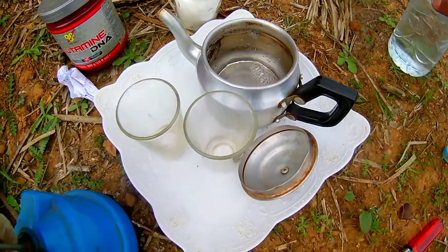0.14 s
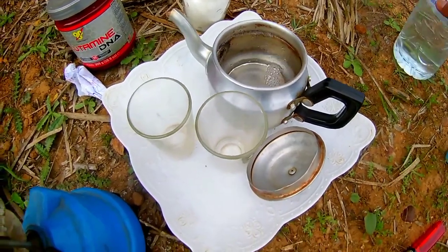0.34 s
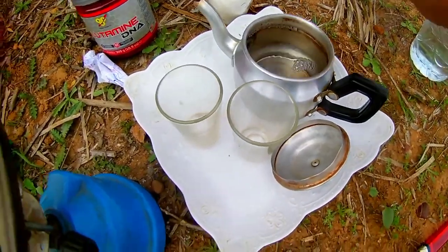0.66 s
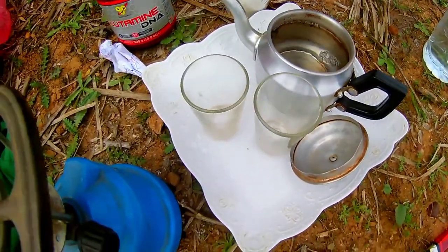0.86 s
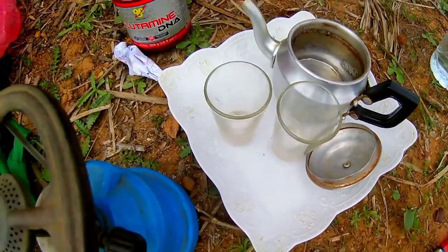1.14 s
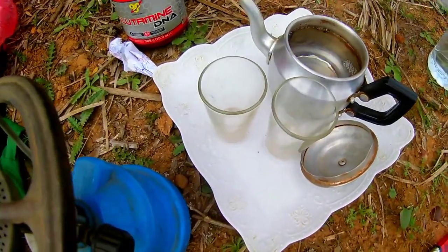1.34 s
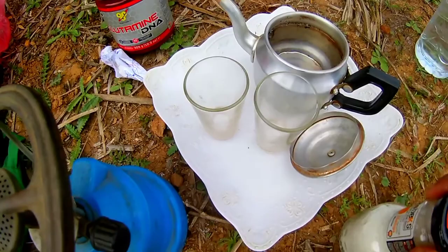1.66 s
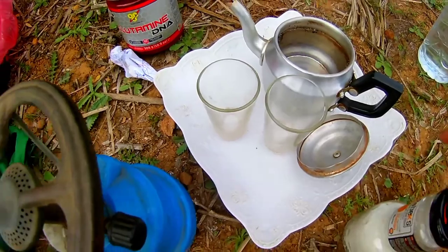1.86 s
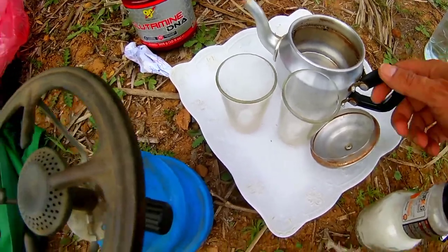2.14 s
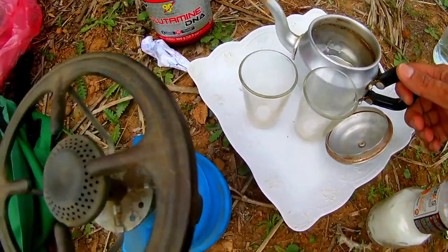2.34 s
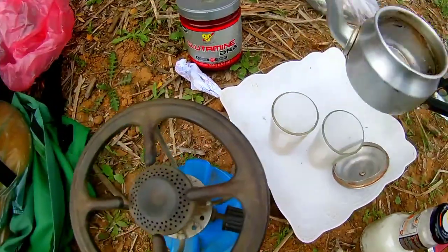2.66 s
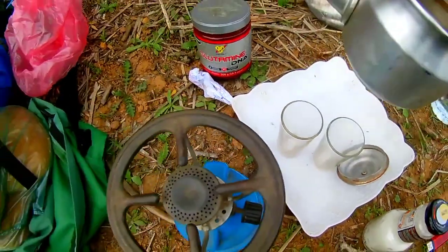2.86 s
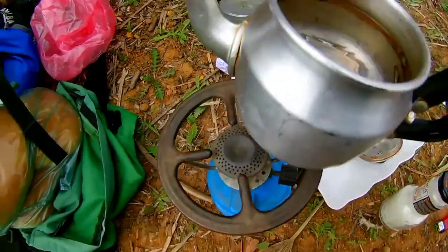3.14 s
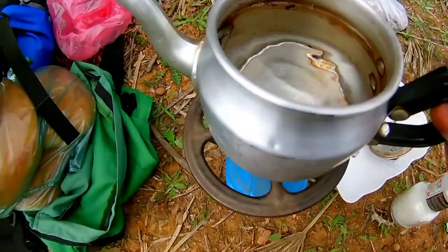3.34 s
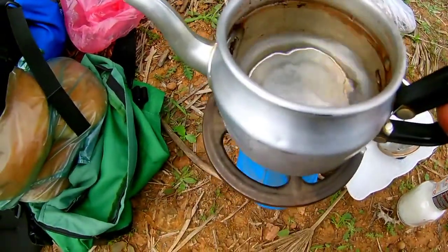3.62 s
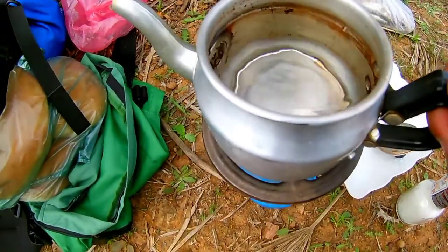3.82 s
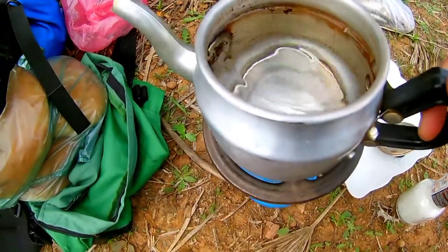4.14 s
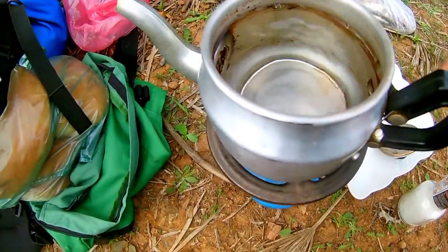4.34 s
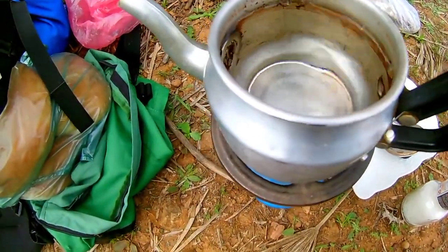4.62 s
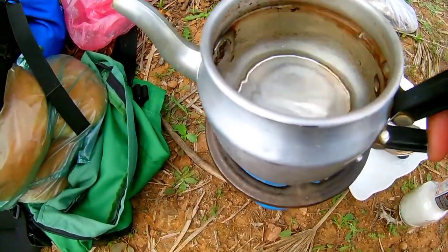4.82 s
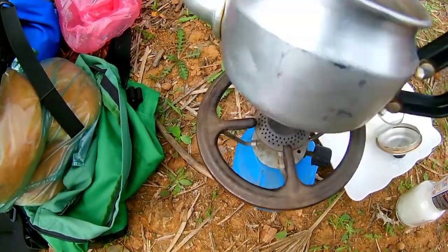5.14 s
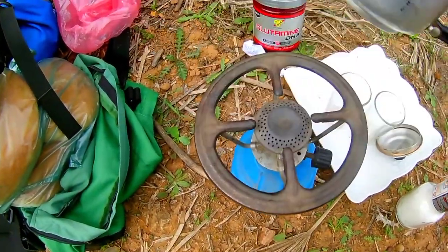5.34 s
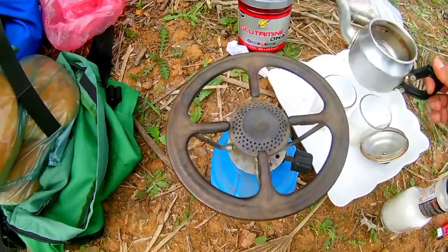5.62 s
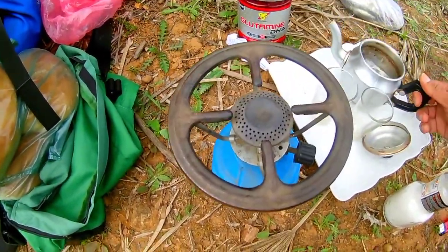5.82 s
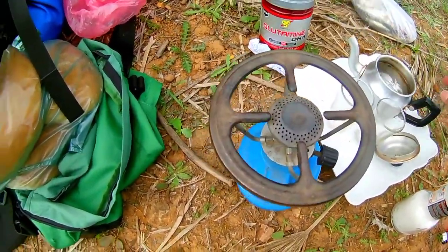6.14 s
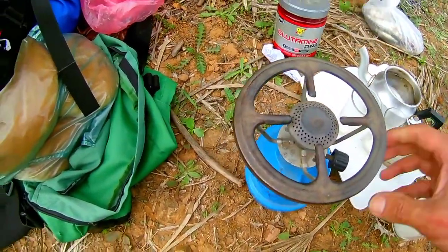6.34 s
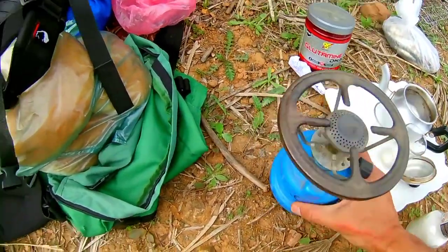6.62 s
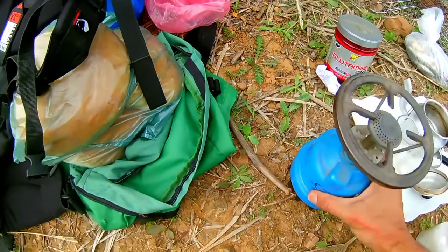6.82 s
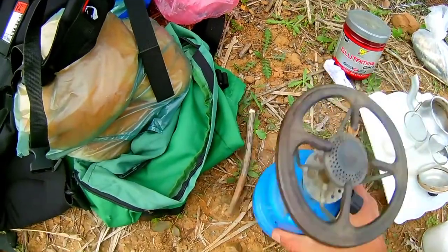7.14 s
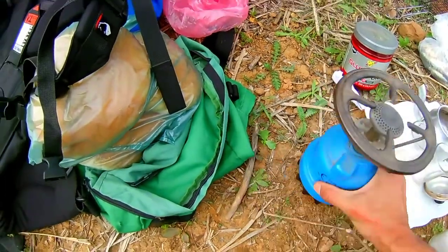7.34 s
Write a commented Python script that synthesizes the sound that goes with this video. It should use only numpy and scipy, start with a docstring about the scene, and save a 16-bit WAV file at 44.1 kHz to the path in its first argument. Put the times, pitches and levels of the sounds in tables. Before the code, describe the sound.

Outdoors in light wind, a jar is set down, a metal teapot scrapes and clinks off a plastic tray, then a stove drags over soil.

```python
"""Camping gear handled in light wind

A jar is set down outdoors, a metal teapot is dragged off a plastic tray, tried on a gas stove's iron
ring and put back beside two glasses; then the stove itself is shoved across the soil.
Blows and sliding grit ring the modes of each thing, with decaying sines for clear clinks and low bumps
and narrow gliding noise for squeals. Shaped noise makes the wind and the microphone's hiss.
"""
import sys
import numpy as np
from scipy import signal
from scipy.fft import rfft, irfft
from scipy.io import wavfile
from scipy.ndimage import uniform_filter1d

SR = 44100
rng = np.random.default_rng(int(sys.argv[2]) if len(sys.argv) > 2 else 0)


def dump_mix(stems):
    """Bounce the given channels to the path in sys.argv[1] as a 16-bit WAV at rate SR."""
    frames = np.atleast_2d(stems).T  # one column per channel
    limited = np.clip(frames, -1, 1)  # hard clip at full scale
    pcm = np.round(limited * 32767).astype(np.int16)
    wavfile.write(sys.argv[1], SR, pcm)


N = 329427  # length of the scene [samples]


def gain_of(db):
    """Level law: decibels to an amplitude factor."""
    return 10 ** (np.asarray(db) / 20)


def evened(x):
    """Normalisation: scales a signal to rms 1."""
    return x / np.sqrt(np.mean(x ** 2) + 1e-20)


def read(points, hz):
    """Logarithmic pitch scale: interpolates a spectrum table between its points."""
    f, value = np.transpose(points)
    return np.interp(np.log(hz + 1), np.log(f + 1), value)


def add(mix, s, sound):
    """Superposition: mixes a sound in at time s [s]."""
    part = mix[round(s * SR):][:len(sound)]
    part += sound[:len(part)]


def wander(samples):
    """Low-passed chance: a moving average of white noise, at rms 1."""
    return evened(uniform_filter1d(rng.standard_normal(N), samples))


def noise(spectrum, lumps_db, lump_s):
    """Spectral shaping: coloured noise of rms 1 from white noise whose level wanders in lumps."""
    lumps = wander(max(int(lump_s * SR), 2))
    white = rng.standard_normal(N) * gain_of(lumps_db * lumps)
    colour = gain_of(read(spectrum, np.fft.rfftfreq(N, 1 / SR)))
    return evened(irfft(rfft(white) * colour, N))


def body(modes, colour, knock_db, edges_hz, scatter_db, size=4096):
    """Modal response to a click at one spot: dying modes over a short knock, in bands of energy 1."""
    t = np.arange(size) / SR
    hz = np.abs(np.fft.fftfreq(size, 1 / SR))
    f, width, db = np.transpose(modes)[:, :, None]
    chance = rng.standard_normal((len(modes), 2, 1))
    db = db + scatter_db * chance[:, 0]  # each spot couples to the modes in its own measure
    f = f * (1 + 0.029 * chance[:, 1])  # the load of the contact detunes them a little
    decay = np.exp(-np.pi * width * t)  # a wider resonance dies sooner
    rings = (gain_of(db) * width * decay * np.sin(2 * np.pi * f * t)).sum(0)
    # the minimum-phase response puts the knock's energy as early as its colour allows
    log_gain = read(colour, hz) * np.log(10) / 20
    knock = np.fft.ifft(np.exp(np.conj(signal.hilbert(log_gain)))).real
    both = evened(rings) + gain_of(knock_db) * evened(knock)
    parts = []
    for band in zip(edges_hz, edges_hz[1:]):
        band_filter = signal.butter(3, band, "band", fs=SR, output="sos")
        parts.append(signal.sosfilt(band_filter, both))
    parts = np.array(parts)
    return parts / np.linalg.norm(parts, axis=1, keepdims=True)


def at_spots(force, thing, dwell_s=0.018, count=6):
    """Position-dependent coupling: each short stretch of force rings the thing from a random spot."""
    spots = [body(*thing) for _ in range(count)]
    moves = np.r_[0, np.flatnonzero(rng.random(N) < 1 / (dwell_s * SR)), N]
    out = np.zeros(N)
    spot = rng.integers(0, count, N)
    for a, b in zip(moves, moves[1:]):
        if force[:, a:b].any():
            rung = signal.fftconvolve(force[:, a:b], spots[spot[a]], axes=1).sum(0)
            add(out, a / SR, rung)
    return out


def band_levels(middle, treble_db):
    """Contact hardness: levels [dB] of bass, middle and treble; the middle follows the treble."""
    at_equal_db, db_per_treble_db = middle
    return 0, at_equal_db + db_per_treble_db * treble_db, treble_db


def struck(blows, middle, rise, tick):
    """Impact: each blow is one hard tick and a quick burst of tiny contacts, as three bands of force."""
    contacts_per_s = 4000
    size = 4000  # longest burst [samples]
    contacts = rng.random(N + size) < contacts_per_s / SR
    chatter = evened(rng.standard_normal(N + size) * contacts)
    force = np.zeros((3, N))
    for s, db, treble_db, length in blows:
        u = np.arange(size) / SR / length
        for k, band_db in enumerate(band_levels(middle, treble_db)):
            # the treble is spent sooner
            shape = np.minimum(u / rise, 1) * np.exp(-(1 + 0.15 * k) * u)
            # the blow's energy is shared among its contacts
            burst = evened(shape * chatter[round(s * SR):][:size]) * shape.std()
            burst[40] += tick / (1 + k) * np.sqrt(length * SR)
            add(force[k], s, gain_of(db + band_db) * burst)
    return force


def rubbed(slides, middle, grit_db, grains_per_s):
    """Sliding friction: strokes over a stream of uneven grit that catches and lets go in lumps."""
    slip_db, slip_s = 3, 0.012
    skirt_db = 20  # each stroke swells and fades by this much over its rise and fall
    grit = rng.choice([-1., 1.], N) * gain_of(grit_db * np.minimum(rng.exponential(1, N), 4))
    slips = gain_of(slip_db * wander(max(int(slip_s * SR), 2)))
    grit = evened(grit * slips * (rng.random(N) < grains_per_s / SR))
    force, t = np.zeros((3, N)), np.arange(N) / SR
    for s, db, treble_db, rise_s, fall_s in slides:
        away = np.maximum((s - t) / rise_s, (t - s) / fall_s)
        stroke = (away < 1) * gain_of(db - skirt_db * away) * grit
        force += gain_of(band_levels(middle, treble_db))[:, None] * stroke
    return force


def handled(blows, slides, thing, middle, grit_db, grains_per_s, rise, tick):
    """Source and resonator: the forces of blows and slides ring the same thing.

    thing: modes, colour, knock re modes [dB], band edges [Hz], scatter of the modes [dB]
    middle: (middle re bass when treble equals bass [dB], slope [dB per dB of treble])
    rise: onset as a share of the contact; tick: strength of the tick re the burst
    """
    force = struck(blows, middle, rise, tick) + rubbed(slides, middle, grit_db, grains_per_s)
    return at_spots(force, thing)


def wind():
    """Turbulence: lumpy low buffeting at the microphone and a softer broad rush above it."""
    # wind strength: (time [s], buffeting level [dB], rush level [dB])
    gusts = [(0, -77, -65), (.35, -66, -66), (1.1, -71, -68.5), (1.5, -90, -65), (2.0, -96, -68),
             (3.0, -68, -68.5), (3.5, -96, -64), (3.8, -71, -65), (4.44, -66.5, -70.5), (4.53, -54, -68.5),
             (4.98, -57, -63), (5.121, -78, -65.5), (5.65, -65, -69.5), (6.3, -74, -69), (7.47, -64.5, -65)]
    # spectrum of the buffeting: (frequency [Hz], relative level [dB per Hz])
    buffet_spectrum = [(12, -20), (30, 3), (55, 2), (100, -8), (200, -22.5), (500, -74)]
    # spectrum of the rush: (frequency [Hz], relative level [dB per Hz])
    rush_spectrum = [(80, 2), (200, 1), (500, -4.5), (1000, -11), (2000, -17), (4000, -30), (8000, -53)]
    t = np.arange(N) / SR
    s, buffet_db, rush_db = np.transpose(gusts)
    buffet = gain_of(np.interp(t, s, buffet_db)) * noise(buffet_spectrum, 3.4, 0.014)
    rush = gain_of(np.interp(t, s, rush_db)) * noise(rush_spectrum, 2.2, 0.019)
    return buffet + rush


def jar():
    """Impact on broad, quickly damped modes: the jar is set down."""
    # blows: (time [s], force [dB], treble re bass [dB], contact length [s])
    jar_blows = [(0.02, -51, -33, 0.014), (0.234, -53, -14, 0.0082), (0.245, -51, -20, 0.0016),
                 (0.353, -57.5, -9.5, 0.019), (0.379, -59.5, -15, 0.005), (1.6068, -50.5, -4.5, 0.0035)]
    # modes before scatter: (frequency [Hz], width [Hz], relative level [dB])
    jar_modes = [(1150, 340, 9), (4200, 450, -24), (6270, 300, -11)]
    # broad colour of the knock: (frequency [Hz], relative level [dB per Hz])
    jar_colour = [(40, -9), (150, 14), (420, -1), (1700, -5), (7000, -39)]
    thing = (jar_modes, jar_colour, 1.5, (40, 1200, 2500, 7200), 2.5)
    return handled(jar_blows, [], thing, middle=(4.5, 0.28), grit_db=3.0, grains_per_s=3000,
                   rise=0.1, tick=0.25)


def clinks():
    """Free vibration: single modes of glass and thin metal ring on, trembling, until stilled."""
    # rings: (time [s], level before decay and tremble [dB], frequency [Hz], rise [s],
    #         time to decay by 60 dB [s], stilled after [s])
    clink_rings = [(.091, -53, 1144, 0.012, 0.074, .2), (1.6051, -30.5, 1163, 0.00036, 0.023, 0.002),
                   (2.373, -49, 915, 0.0025, 0.38, 0.04), (2.405, -70, 3410, 0.014, 0.81, 0.05),
                   (2.447, -57.5, 3304, 0.0023, 1.8, 0.16), (2.6, -69.5, 3330, .01, 1.1, 0.12),
                   (3.265, -64, 900, .01, 0.82, 0.098), (3.349, -57.5, 3620, .0021, 0.041, .1),
                   (3.51, -53.5, 370, .008, 0.09, .1), (3.6, -67.5, 1590, 0.015, 2.7, 0.21),
                   (3.64, -60.5, 335, 0.024, 0.38, 0.11), (3.866, -43.5, 1790, 0.0043, 0.047, .1),
                   (3.864, -51.5, 2250, 0.001, 0.042, .1), (3.869, -46.5, 529, 0.0028, 0.097, .15),
                   (4.943, -53.5, 1780, 0.0044, 0.14, .08), (4.947, -41.5, 534, 0.0039, 0.037, .1),
                   (5.953, -71, 5192, 0.0046, 0.46, 0.062), (6.21, -49.5, 592, 0.0024, 0.035, .1),
                   (6.485, -68.5, 3820, .003, 0.085, .02), (6.494, -32.5, 1380, 0.031, 0.066, .1),
                   (6.799, -58.5, 689, 0.0074, .8, 0.15), (7.305, -74, 9300, .005, 0.36, 0.049)]
    damp_s = 0.003  # time constant with which a touch stills a ring
    tremble_db = 2.5  # rocking makes the level waver
    out, t = np.zeros(N), np.arange(SR // 2) / SR
    for s, db, hz, rise, t60, length in clink_rings:
        shape = np.minimum(t / rise, 1) * np.exp(-np.maximum(t - length, 0) / damp_s)
        add(out, s, gain_of(db - 60 * t / t60) * shape * np.sin(2 * np.pi * hz * (s + t)))
    return out * gain_of(tremble_db * wander(350))


def tray():
    """Impact and friction on damped modes: the plastic tray is knocked and scraped."""
    # blows: (time [s], force [dB], treble re bass [dB], contact length [s])
    tray_blows = [(0.866, -32, -19.5, 0.0084), (0.882, -40.5, -12, 0.012), (0.898, -46, -20, 0.0041),
                  (2.148, -47.5, -17.5, 0.024), (2.574, -34, -20, 0.019), (2.589, -32.5, -15, 0.0029),
                  (2.627, -36.5, -16, 0.017), (2.729, -36, -19, 0.0093), (5.656, -53.5, -11, 0.0077),
                  (5.679, -52.5, -16, 0.008), (5.878, -22.5, -19, 0.0085), (5.891, -38.5, -2, 0.0047),
                  (5.906, -34.5, -21, 0.0049), (5.9355, -26, -24, 0.0031), (5.942, -33, -29, 0.0048),
                  (5.949, -40.5, -16, 0.0071), (5.964, -43, -16, 0.015), (5.989, -54, -6, 0.017),
                  (6.003, -45.5, -34, 0.014), (6.071, -53, -19, 0.0051), (6.57, -61, 1, 0.043),
                  (6.612, -46, -42, 0.0067), (6.669, -39.5, -24, 0.0081), (6.684, -45.5, -37, 0.0055),
                  (6.719, -44.5, -43, 0.0024), (6.795, -54.5, -16, 0.0062)]
    # strokes: (time of firmest pressure [s], level [dB], treble re bass [dB], rise [s], fall [s])
    tray_slides = [(0.87, -46.5, -40, 0.0038, 0.098), (5.665, -62, -21, .005, 0.14),
                   (5.89, -36.5, -17, 0.0081, 0.077), (5.98, -43.5, -24, 0.033, 0.079),
                   (6.689, -54.5, -31, 0.21, 0.11), (6.941, -56.5, -12.5, 0.2, 0.042)]
    # modes before scatter: (frequency [Hz], width [Hz], relative level [dB])
    tray_modes = [(575, 12.5, 6), (796, 25, 3), (920, 120, 3), (989, 49, 2.5), (1374, 280, -1),
                  (1630, 65, 1), (1816, 31, -2), (2080, 68, -12), (2177, 120, -13.5), (2443, 220, -10.5),
                  (3530, 410, -12), (6330, 99, -41)]
    # broad colour of the knock: (frequency [Hz], relative level [dB per Hz])
    tray_colour = [(100, -65), (300, -13), (700, -2), (1500, -0.5), (3000, -21), (3700, -21), (6500, -48),
                   (7800, -57)]
    thing = (tray_modes, tray_colour, -5, (370, 1200, 2500, 6800), 3.0)
    return handled(tray_blows, tray_slides, thing, middle=(1, 0.2), grit_db=2.4, grains_per_s=1500,
                   rise=0.22, tick=0.3)


def bumps():
    """Pressure pulse: a dull cycle or two as a weight lands or water slaps the pot."""
    # bumps: (time [s], push before rise and decay [dB], frequency [Hz])
    bump_pushes = [(1.6069, -32, 169), (1.6091, -29.5, 525), (2.582, -39, 180), (3.392, -45, 405),
                   (3.401, -37.5, 272), (3.438, -45, 182), (3.452, -41, 306), (3.746, -45.5, 97),
                   (5.879, -36, 244), (7.272, -30, 199)]
    out, t = np.zeros(N), np.arange(3000) / SR
    for s, db, hz in bump_pushes:
        shape = np.minimum(hz * t / 0.4, 1) * np.exp(-hz * t / 0.75)
        add(out, s, -gain_of(db) * np.sin(2 * np.pi * hz * t) * shape)
    return out


def pot():
    """Impact and friction on narrow modes: the metal teapot is dragged and set down."""
    # blows: (time [s], force [dB], treble re bass [dB], contact length [s])
    pot_blows = [(2.223, -59.5, -37, 0.02), (2.271, -45, -35, 0.0091), (2.291, -43, -64, 0.01),
                 (2.304, -38.5, -34, 0.0026), (2.375, -52, -44, 0.0032), (2.445, -38.5, -7, 0.0019),
                 (2.492, -38.5, -15.5, 0.005), (2.514, -44, -10, 0.0022), (2.538, -42.5, -35, 0.0074),
                 (2.593, -28.5, -16.5, 0.007), (2.64, -36, -22, 0.0076), (2.694, -48.5, -29, 0.0043),
                 (2.775, -54, -28, 0.004), (2.805, -45, -35, 0.0029), (2.841, -50, -18, 0.0028),
                 (2.851, -49.5, -21, 0.0019), (3.253, -52, 5, 0.0095), (3.422, -62.5, 4, 0.0045),
                 (3.44, -55, -26, 0.0035), (3.864, -61.5, 4.5, 0.018), (4.868, -59, -6, 0.011),
                 (4.907, -61.5, 7, 0.0079), (4.951, -58.5, 7, 0.01)]
    # strokes: (time of firmest pressure [s], level [dB], treble re bass [dB], rise [s], fall [s])
    pot_slides = [(2.17, -62, -42, 0.12, 0.035), (2.29, -61, -28, 0.07, 0.046),
                  (2.38, -62, -25, 0.018, 0.085), (2.52, -50.5, -23, 0.15, 0.057),
                  (2.64, -55, -52, 0.11, 0.14), (2.748, -43, -32, 0.098, 0.085),
                  (3.265, -65, -9.5, 0.013, 0.21), (3.66, -70, -6.5, 0.21, 0.23),
                  (4.94, -72, 0, 0.27, 0.11)]
    # modes before scatter: (frequency [Hz], width [Hz], relative level [dB])
    pot_modes = [(623, 35, -5.5), (907, 18, 0.5), (977, 42, -2.5), (1300, 19, -24), (1613, 59, 8),
                 (1745, 47, 5), (2120, 33, -9), (2550, 24, -7.5), (3700, 120, -9), (3670, 71, -14.5),
                 (4150, 59, -16), (5470, 130, -29), (5650, 28, -25), (6200, 41, -13)]
    # broad colour of the knock: (frequency [Hz], relative level [dB per Hz])
    pot_colour = [(150, -71), (450, 15.5), (900, -1), (1700, 7.5), (3000, -2.5), (4000, -9), (6500, -11.5),
                  (8000, -44), (12000, -31)]
    thing = (pot_modes, pot_colour, -9, (520, 1200, 2500, 11000), 3.0)
    return handled(pot_blows, pot_slides, thing, middle=(7, 0.28), grit_db=3.2, grains_per_s=1200,
                   rise=0.33, tick=0.58)


def stove():
    """Impact and friction on many metal modes: the stove is shoved across the soil."""
    # blows: (time [s], force [dB], treble re bass [dB], contact length [s])
    stove_blows = [(6.888, -44.5, -28.5, 0.018), (6.997, -40.5, -65, 0.0085), (7.03, -35.5, -32, 0.0056),
                   (7.057, -45.5, -28, 0.0077), (7.081, -29, -28, 0.0051), (7.104, -41.5, -20, 0.011),
                   (7.119, -39.5, -24, 0.034), (7.207, -46, -25, 0.016), (7.228, -36.5, -18, 0.012),
                   (7.239, -42.5, -25, 0.014), (7.268, -33.5, -11, 0.015), (7.326, -55, -7, 0.012),
                   (7.398, -44, -46, 0.014), (7.427, -50, -32, 0.0079), (7.449, -43, -10, 0.0084),
                   (7.462, -43, -9, 0.0047)]
    # strokes: (time of firmest pressure [s], level [dB], treble re bass [dB], rise [s], fall [s])
    stove_slides = [(7.049, -42.5, -38, 0.079, 0.059), (7.111, -43, -14, 0.06, 0.043),
                    (7.24, -51, -23.5, 0.13, 0.093), (7.286, -48, -49, 0.09, 0.11),
                    (7.46, -44.5, -20.5, 0.087, .1)]
    # modes before scatter: (frequency [Hz], width [Hz], relative level [dB])
    stove_modes = [(531, 35, 5), (612, 36, -1.5), (1020, 170, -3), (1310, 490, 1), (1620, 22, -3),
                   (1920, 73, -2.5), (2650, 130, -18), (3300, 130, -14.5), (3554, 64, -6), (3866, 48, -8.5),
                   (4260, 82, -11), (4470, 43, -24), (5750, 140, -20), (6410, 81, -24), (9400, 180, -41),
                   (10900, 220, -18), (11200, 440, -34)]
    # broad colour of the knock: (frequency [Hz], relative level [dB per Hz])
    stove_colour = [(90, -77), (220, -12.5), (400, -8.5), (526, -3), (830, -26), (1200, -25), (2380, -18),
                    (3610, -28.5), (5200, -36), (6400, -27), (7950, -62), (8900, -23), (13500, -47)]
    thing = (stove_modes, stove_colour, -9, (110, 2500, 8000, 13000), 3.2)
    return handled(stove_blows, stove_slides, thing, middle=(7.05, 0.48), grit_db=2.4,
                   grains_per_s=2200, rise=0.52, tick=0.21)


def squeals():
    """Friction-driven resonance: narrow noise glides in pitch as the stove's thin metal scrapes."""
    # whistles: (time [s], length [s], level before the swell [dB], start [Hz], end [Hz])
    squeal_glides = [(7.109, 0.067, -54, 3720, 3270), (7.422, 0.046, -51, 3420, 3480)]
    width_hz = 100
    out, r = np.zeros(N), np.exp(-np.pi * width_hz / SR)
    for s, length, db, start_hz, end_hz in squeal_glides:
        u = np.linspace(0, 1, int(length * SR))
        complex_noise = [1, 1j] @ rng.standard_normal((2, 8000))
        # the last samples, where the filter has settled
        wobble = signal.lfilter([1 - r], [1, -r], complex_noise)[-len(u):]
        phase = 2 * np.pi * np.cumsum(start_hz + (end_hz - start_hz) * u) / SR
        tone = (wobble * np.exp(1j * phase)).real
        swell = np.sqrt(np.sin(np.pi * u).clip(0))
        add(out, s, gain_of(db) * swell * evened(tone))
    return out


def scene():
    """Superposition: every source summed at the microphone, as one channel."""
    handling = jar() + tray() + pot() + stove()
    return (handling + clinks() + squeals() + bumps() + wind())[None]


def record(dry):
    """Linear filtering: the housing cancels one pitch, hiss is added, then the band is limited."""
    # spectrum of the microphone's hiss: (frequency [Hz], relative level [dB per Hz])
    hiss_spectrum = [(590, -33), (1000, -4.5), (2130, -7), (3080, -7.5), (7370, -12), (8550, -14.5),
                     (15500, -11)]
    hiss_db = -75.5  # rms ahead of the band limit
    notch_hz, notch_q, edge_hz = 7800, 7.5, 15520
    notched = signal.lfilter(*signal.iirnotch(notch_hz, notch_q, SR), dry)
    wet = notched + gain_of(hiss_db) * noise(hiss_spectrum, 1.0, 0.05)
    low_pass = signal.firwin(1023, edge_hz, window=("kaiser", 9), fs=SR)
    return signal.oaconvolve(wet, low_pass[None], "same")


dry = scene()
out = record(dry)
dump_mix(out)
```